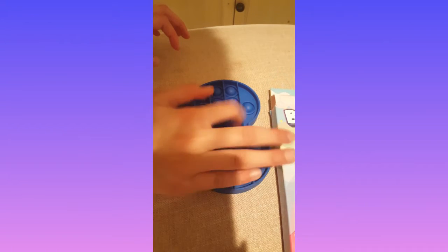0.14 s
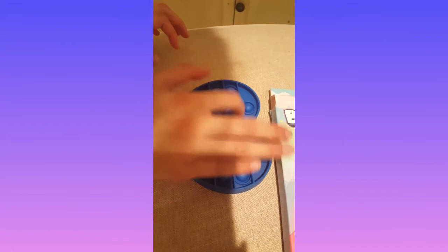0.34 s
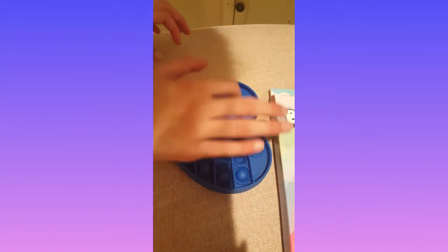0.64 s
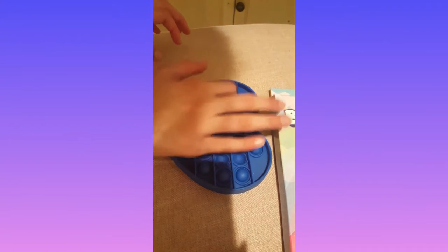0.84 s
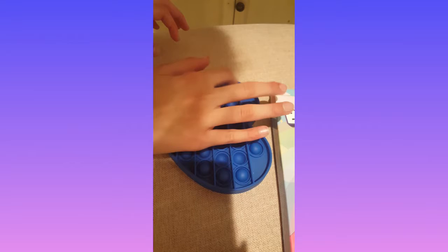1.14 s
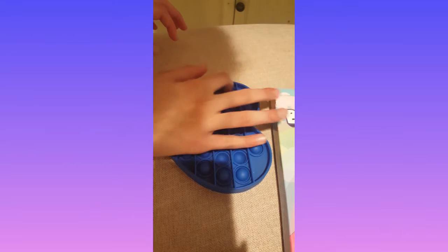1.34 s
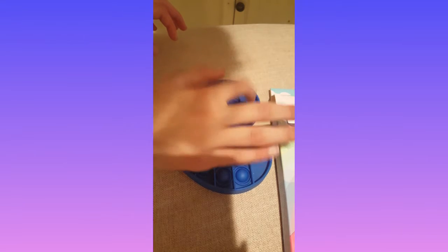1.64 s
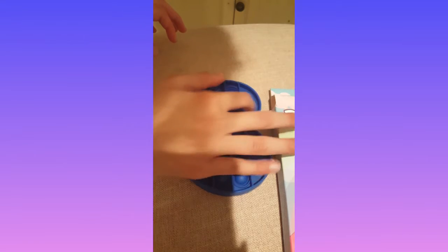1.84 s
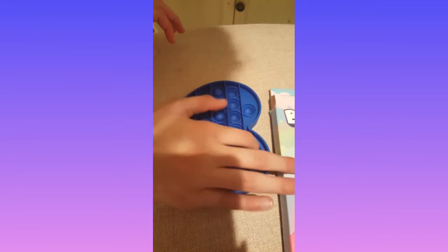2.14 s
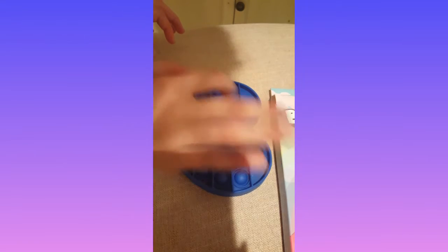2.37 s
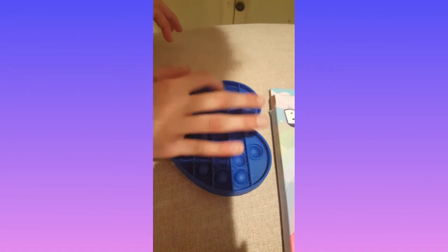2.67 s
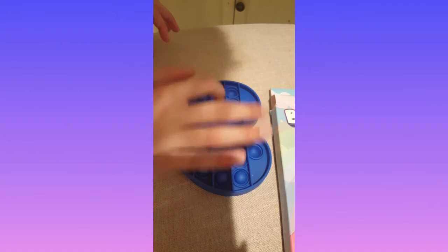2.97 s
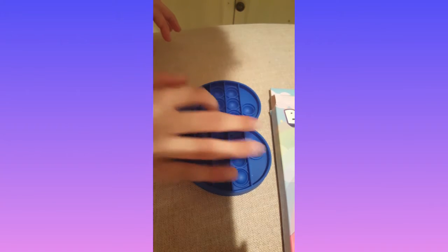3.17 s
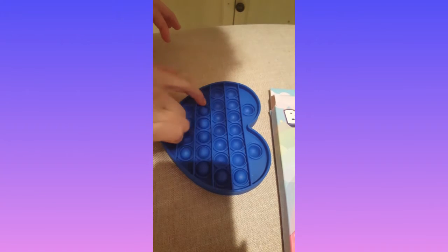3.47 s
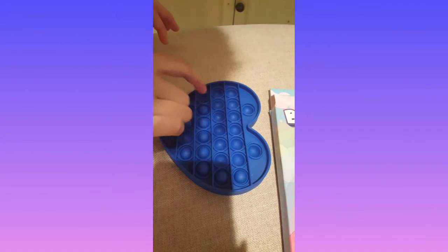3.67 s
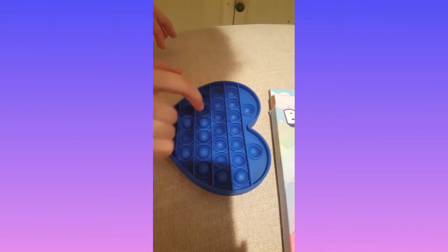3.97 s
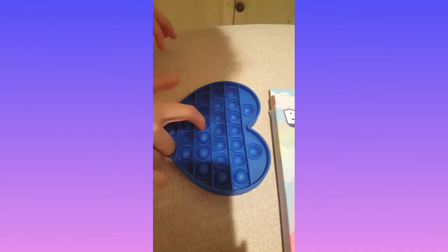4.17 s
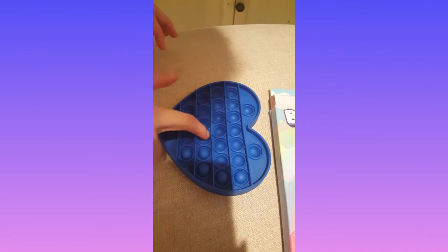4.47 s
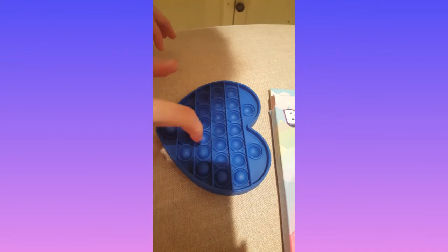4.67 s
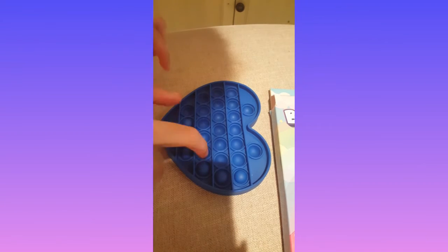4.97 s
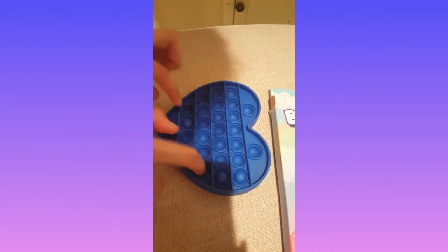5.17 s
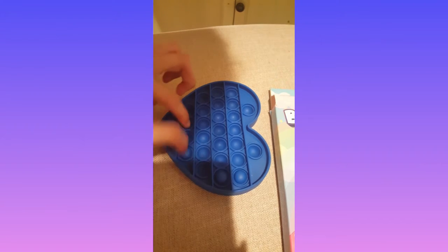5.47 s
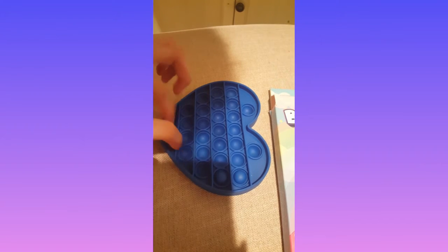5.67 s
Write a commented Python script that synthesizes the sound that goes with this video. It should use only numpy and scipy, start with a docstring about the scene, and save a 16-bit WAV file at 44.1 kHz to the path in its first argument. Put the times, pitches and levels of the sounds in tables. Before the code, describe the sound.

Close, uneven pops from a silicone bubble toy on a table, each led by a faint fingertip tap.

```python
"""A cloth-covered table in a quiet room, a phone's two microphones close to a silicone bubble toy.
A fingertip taps a dome, which loads up and snaps through with a short pop; the table thuds and the
room answers. Between pops the skin unsticks with tiny ticks and squeaks, and once a hand slides over
the toy. Underneath lie room air, microphone hiss and the low rumble of hands shifting on the table."""
import sys
import numpy as np
from scipy import signal
from scipy.fft import rfft, irfft, next_fast_len
from scipy.io import wavfile
from scipy.ndimage import uniform_filter1d

SR = 44100
rng = np.random.default_rng(int(sys.argv[2]) if len(sys.argv) > 2 else 0)


def int16_out(signal):
    """Quantize to a 16-bit WAV file."""
    q = np.round(np.clip(np.atleast_2d(signal).T, -1, 1) * 32767)
    wavfile.write(sys.argv[1], SR, q.astype(np.int16))


N = 256485
SPAN, LEAD, TAIL = 2 ** 14, 512, 15000  # samples: one contact, its lead-in, the room's tail
TIME = np.arange(N) / SR
FREQ = np.fft.rfftfreq(SPAN, 1 / SR)  # Hz axis of one contact's spectrum


def amp(db):
    """Decibels to gain."""
    return 10 ** (np.asarray(db) / 20)


def unit(x):
    """Scaled to rms 1."""
    return x / np.sqrt(np.mean(x ** 2) + 1e-20)


def peaked(spectrum):
    """Scaled so that its waveform peaks at 1."""
    return spectrum / np.abs(irfft(spectrum)).max()


def delay(seconds):
    """Spectrum of a delay."""
    return np.exp(-2j * np.pi * FREQ * seconds)


def along(points, hz):
    """(Hz, value) points read on a log axis."""
    f, v = np.transpose(points)
    return np.interp(np.log(hz + 1), np.log(f + 1), v)


def level(rows):
    """Gain per sample from (s, dB) rows."""
    s, db = np.transpose(rows)
    return amp(np.interp(TIME, s, db, left=-120, right=-120))


def sides(db):
    """Left and right gains for a level difference."""
    return amp(np.vstack([db / 2, -db / 2]))


def filtered(x, response):
    """x through a complex frequency response."""
    size = next_fast_len(N + SR // 2)
    return irfft(rfft(x, size) * response(np.fft.rfftfreq(size, 1 / SR)), size)[..., :N]


def resonances(modes, f):
    """Causal sum of (centre, width, dB) resonances; valleys form between neighbours."""
    return sum(amp(db) * 1j * f * w / (c * c - f * f + 1j * f * w) for c, w, db in modes)


def rush(spectrum, likeness, patchy_db):
    """Stereo noise of rms 1 with patches of random gain in time and frequency."""
    bins = signal.stft(rng.standard_normal((2, N)), nperseg=512)[2]
    patches = uniform_filter1d(rng.standard_normal(bins.shape[1:]), size=6, axis=0)
    patches = unit(uniform_filter1d(patches, size=10, axis=1))
    pair = signal.istft(bins * amp(patchy_db * patches), nperseg=512)[1][:, :N]

    def mid_side(hz):
        angle = np.arccos(np.clip(along(likeness, hz), -1, 1)) / 2
        return amp(along(spectrum, hz)) * [np.cos(angle), np.sin(angle)]
    mid, side = filtered(pair, mid_side)
    return unit(np.array([mid + side, mid - side]))


# The still room with the microphones' hiss. Each row: frequency in Hz, relative level in dB.
AIR_SPECTRUM = [(24, -40.5), (40, -6), (49, 1.5), (97, -3), (206, -7), (308, -8), (367, -10.5), (473, -13),
                (656, -16), (1290, -17), (2900, -21.5), (4920, -27), (10500, -30.5), (14900, -25),
                (16500, -42.5)]
# How alike the two microphones hear it. Each row: frequency in Hz, likeness from 0 to 1.
AIR_LIKENESS = [(60, 0.3), (200, 1), (600, 0.016), (15000, 0.0079)]
# Hands shifting on the table. Each row: time in seconds, level in dB.
RUMBLE_LEVELS = [(0.0, -62), (0.58, -62), (0.74, -53), (0.89, -60), (1.35, -59.5), (1.57, -61), (2.62, -65),
                 (2.76, -58.5), (3.33, -68.5), (4.33, -63), (4.9, -66), (5.04, -61.5), (5.46, -53),
                 (5.8, -64.5)]


def background():
    """Steady air and hiss; the table carries the hands' rumble, louder on the right."""
    air = amp(-62) * rush(AIR_SPECTRUM, AIR_LIKENESS, patchy_db=0)
    bass = [(20, -41), (32, -14.5), (50, 1.5), (130, -9.5), (300, -21.5), (600, -47.5), (1200, -93.5)]
    rumble = rush(bass, likeness=[(50, .63)], patchy_db=2.5)
    return air + level(RUMBLE_LEVELS) * rumble * sides(-3.5)


# One stroke of the hand, close up. Each row: time in seconds, level in dB.
SLIDE_LEVELS = [(.71, -81), (.735, -52), (.78, -49), (.83, -44.5), (.9, -56), (1.05, -67.5)]
# Skin rubbing on silicone. Each row: frequency in Hz, relative level in dB.
RUB_SPECTRUM = [(120, -24.5), (300, -7), (700, -1), (1500, -6.5), (2500, -2.5), (4000, -12.5), (6000, -21),
                (9000, -25.5), (13000, -48), (20000, -83)]


def hand_slide():
    """A hand brushes across the silicone."""
    return level(SLIDE_LEVELS) * rush(RUB_SPECTRUM, likeness=[(300, .4), (1500, .05)], patchy_db=1)


# Ticks close to the phone. Each row: start in seconds, peak level in dB, pitch in Hz.
SKIN_TICKS = [(1.065, -48, 5830), (1.241, -55, 5000), (1.300, -53, 13600), (1.531, -50, 4700),
              (1.961, -52, 3850), (3.005, -54.5, 3840), (4.976, -57, 6540), (5.211, -46.5, 5400)]


def ticks(t60_s=.014, relative_width=.54):
    """Skin unsticks from silicone in tiny bright bursts of noise around a pitch."""
    out = np.zeros((2, N))
    for start, db, hz in SKIN_TICKS:
        decay = (TIME >= start) * amp(-60 * np.abs(TIME - start) / t60_s)
        noise = decay * rng.standard_normal((2, N))
        burst = filtered(noise, lambda f: resonances([(hz, relative_width * hz, 0)], f) ** 2)
        out += amp(db) * burst / np.abs(burst).max()
    return out


# Squeaks, a little to the right. Each row: centre in seconds, level in dB, pitch in Hz,
# length in seconds.
SKIN_SQUEAKS = [(1.449, -44, 1578, 0.0077), (1.538, -50.5, 703, 0.014), (1.555, -45, 691, .014)]


def squeaks():
    """Skin peels off silicone in short soft notes, roughened as it slips."""
    roughness = 1 + .8 * unit(uniform_filter1d(rng.standard_normal((2, N)), size=60))
    notes = sum(amp(db) * np.exp(-(2.7 * (TIME - s) / length) ** 2) * np.sin(2 * np.pi * hz * TIME)
                for s, db, hz, length in SKIN_SQUEAKS)
    return notes * roughness * sides(-1.5)


# The room heard from the table. Each row: frequency in Hz, seconds to fade by 60 dB.
ROOM_DECAY = [(100, 0.17), (420, 0.26), (1100, 0.32), (2900, 0.25), (7700, 0.32), (15000, .15)]
# The colour of its echo. Each row: frequency in Hz, relative level in dB.
ROOM_COLOUR = [(100, 3.5), (500, -2), (1100, -2), (2000, -3.3), (3200, -0.5), (4500, -3.5), (7000, 1.5),
               (12000, -27.5)]


def room(build_s=.002, reflection_s=.0125, shared_hz=350):
    """Spectrum of a fresh reverberant tail; below shared_hz both microphones hear much the same."""
    hz, t, bins = signal.stft(rng.standard_normal((2, TAIL)), SR, nperseg=128)
    fade = amp(along(ROOM_COLOUR, hz)[:, None] - 60 * t / along(ROOM_DECAY, hz)[:, None])
    tail = signal.istft(bins * fade, SR, nperseg=128)[1][:, :TAIL]
    t = np.arange(TAIL) / SR
    onset = np.clip(t / build_s, 0, 1) ** 1.4
    reflection = 2.3 * np.exp(-((t - reflection_s) / .00061) ** 2)
    tail = tail * (onset + reflection) * np.sqrt(1 - (t / t[-1]) ** 2)
    left, right = rfft(tail / np.linalg.norm(tail[0]), SPAN)
    shared = .85 / (1 + (FREQ / shared_hz) ** 2)
    return np.array([left, shared * left + np.sqrt(1 - shared ** 2) * right])


# The table's modes in two groups, boom and knock. Each row: pitch in Hz, width in Hz, gain in dB.
TABLE_MODES = [
    [(48, 27, -2), (71.4, 120, -2), (99, 60, -5)],
    [(157.2, 29, -1), (250, 220, -10)],
]
# The thud at the microphones. Each row: frequency in Hz, left over right in dB.
THUD_BALANCE = [(45, -11), (75, -10), (125, -3), (220, -1)]


def table_thud(force, boom_db, knock_db):
    """The table takes the blow a little later; its slow boom swells behind the knock."""
    boom, knock = [peaked(force * resonances(modes, FREQ * amp(rng.normal(0, .26))))  # slightly detuned
                   for modes in TABLE_MODES]
    swell = lambda seconds: 1 / (1 + 2j * np.pi * FREQ * seconds) ** 2
    boom = amp(boom_db) * peaked(boom * swell(.0042)) * delay(.0095)
    knock = amp(knock_db) * peaked(knock * swell(.00076)) * delay(.0033)
    low_cut = (1j * FREQ / (40 + 1j * FREQ)) ** 3
    return (boom + knock) * low_cut * sides(along(THUD_BALANCE, FREQ))


# The phone's body shades its microphones. Each row: frequency in Hz, left over right in dB.
PHONE_SHADING = [(300, -.5), (700, -2.5), (1300, 3), (2400, 3.5), (4400, 0), (9000, 12), (14000, 12)]
# Sound reaches the left microphone first. Each row: frequency in Hz, phase lead in radians.
LEFT_PHASE_LEAD = [(100, 0), (520, .3), (1210, 1.6), (2240, 1.4), (3270, 1.8), (4250, 2.2), (5300, 4.2),
                   (7320, 7), (16600, 32.8)]


def close_path(sound):
    """From toy to microphones; things on the table scatter four weak copies on the way."""
    turn = np.exp(.5j * along(LEFT_PHASE_LEAD, FREQ))
    direct = sound * sides(along(PHONE_SHADING, FREQ)) * [turn, 1 / turn]
    delays_s = rng.uniform(.002, .006, size=(4, 2, 1))
    gains = rng.normal(0, .05, size=(4, 2, 1))
    return direct * (1 + np.sum(gains * delay(delays_s), axis=0))


# The slap's bands in two groups, crack and tick. Each row: centre and width as multiples of the
# group's pitch, weight in dB.
SLAP_BANDS = [
    [(.81, 0.25, -1), (1, 0.5, 8), (1.46, 0.42, -12.5)],
    [(1, 0.51, -4.5), (1.385, 0.084, -1.5)],
]


def slap(drive, levels_db, crack_hz, tick_hz=10600):
    """The toy's skin slaps the table: a crack with a higher tick."""
    return sum(amp(db) * peaked(drive * resonances(modes, FREQ / hz) ** 2)
               for db, modes, hz in zip(levels_db, SLAP_BANDS, (crack_hz, tick_hz)))


# A dome's modes in four groups: cavity, wall, rim, edge. Each row: centre and width as multiples of
# the group's pitch, gain in dB.
DOME_MODES = [
    [(.62, .4, -23.5), (1.01, .22, 4.5)],
    [(1.01, .2, 2.5), (1.42, .3, 3)],
    [(1.01, .2, .5)],
    [(1.01, .16, 7), (1.15, .14, -1.5)],
]


def dome_ring(force, levels_db, pitches_hz, edge_over_rim=1.233):
    """The force rings the dome's cavity, wall, rim and edge."""
    pitches_hz = (*pitches_hz, edge_over_rim * pitches_hz[-1])
    cutoffs = (1.1, 2.83, 2.8, 1.6)  # soft rubber passes little above these multiples of each pitch
    ring = 0
    for modes, db, hz, cutoff in zip(DOME_MODES, levels_db, pitches_hz, cutoffs):
        response = resonances(modes, FREQ / hz) * np.exp(-(FREQ / hz / cutoff) ** 4)
        ring += amp(db) * peaked(force * response)
    low_cut = 1j * FREQ / (260 + 1j * FREQ)  # so small a source radiates little bass
    hand_echo = 1 + .047 * delay(.0016)  # off the hand above the toy
    return ring * low_cut * hand_echo


def contact(start, dome_db, slap_db, boom_db, knock_db, pitches_hz, crack_hz, load_s, sign, room_db):
    """One contact: force builds over load_s and lets go, ringing dome, table and room."""
    release = delay(LEAD / SR + .0027)
    force = sign * release / (1 - 2j * np.pi * FREQ * load_s)
    dome = dome_ring(force, dome_db, pitches_hz)
    # close by the slap is a grainy spray; the room's walls hear its average colour
    spray = rfft(rng.standard_normal(600) * amp(-60 * np.arange(600) / SR / .0076), SPAN)
    near = close_path(dome + slap(release * spray, slap_db, crack_hz))
    slap_colour = amp(-1.5) * np.abs(slap(release, slap_db, crack_hz))
    far = np.hypot(np.abs(dome), slap_colour) * np.exp(1j * np.angle(dome))
    thud = table_thud(force, boom_db, knock_db)
    reverb = (amp(room_db) * far + amp(-2.5) * thud) * room()
    padded = np.zeros((2, N + 3 * SPAN))
    first = SPAN + round(start * SR) - LEAD
    padded[:, first:first + SPAN] = irfft(near + thud + reverb)
    return padded[:, SPAN:SPAN + N]


# Fingertips landing on or leaving the toy, close to the phone. Each row: start in seconds,
# dome wall level in dB, table boom in dB.
FINGER_TAPS = [(.220, -34, -33.5), (0.522, -36.5, -39), (1.061, -36, -40), (1.334, -43, -58),
               (1.529, -44.5, -55), (1.738, -38, -42.5), (1.901, -41, -42), (2.122, -35.5, -48.5),
               (2.563, -32.5, -37.5), (2.695, -41, -44), (2.795, -33.5, -41), (3.069, -31, -46),
               (3.506, -34.5, -38.5), (3.535, -69, -54.5), (3.823, -33, -48.5), (4.169, -34.5, -45),
               (4.481, -36.5, -44), (4.498, -42.5, -39), (4.866, -34.5, -56), (5.126, -33, -39),
               (5.355, -40, -57), (5.549, -33, -41.5), (5.782, -40.5, -47.5)]


def taps():
    """A fingertip's tap is much quieter than a pop and pushes inward."""
    out = np.zeros((2, N))
    for start, wall_db, boom_db in FINGER_TAPS:
        dome_db = wall_db + np.array([-6, 0, -14.5, -17.5])  # cavity, wall, rim, edge
        slap_db = wall_db + np.array([-22, -39])  # crack, tick
        out += contact(start, dome_db, slap_db, boom_db, boom_db - 2, pitches_hz=(734, 1170, 2500),
                       crack_hz=5500, load_s=.00024, sign=-1, room_db=-15.5)
    return out


# Domes popping close to the phone; the first is heard only as its tail. Each row: start in seconds,
# wall level in dB, snap (rim over wall) and crack over wall in dB, table boom and knock in dB,
# then the pitches of cavity, wall, rim and crack in Hz.
DOME_POPS = [(-.045, -3.5, -18.5, -22, -33, -52, 680, 1010, 2520, 5640),
             (0.242, -4, -14.5, -40, -30.5, -37.5, 654, 975, 2510, 5300),
             (0.55, -5.5, -10, -27, -38.5, -26, 786, 915, 2730, 4980),
             (0.817, -4, -12.5, -23, -26.5, -29, 550, 1010, 2650, 6470),
             (1.347, -5.5, -13.5, -22.5, -34.5, -40, 630, 1156, 2810, 4470),
             (1.759, -5, -13.5, -30, -30, -33, 774, 1057, 2520, 5330),
             (2.1534, -2.5, 1.5, -25, -33.5, -26, 728, 1180, 2367, 5870),
             (2.582, -5, -14.5, -37, -31, -43, 712, 1023, 2580, 5840),
             (2.8135, -4.5, -19, -24.5, -32, -39.5, 696, 1445, 2707, 4400),
             (3.0863, -1.5, -0.5, -21.5, -44, -27.5, 590, 1230, 2303, 5200),
             (3.567, -4.5, -14.5, -30, -41.5, -43.5, 721, 1108, 2485, 4670),
             (3.839, -3.5, -15, -28, -29.5, -41.5, 682, 1113, 2480, 5400),
             (4.194, -2.5, -14.5, -44, -35, -37, 712, 1110, 2450, 5900),
             (4.528, -3, 1, -14, -45, -46.5, 686, 1397, 2535, 5576),
             (4.889, -1.5, -13.5, -54.5, -31.5, -43.5, 700, 1115, 2530, 6070),
             (5.145, -1, -15, -33.5, -24.5, -37, 692, 1110, 2370, 6000),
             (5.386, -3, -1, -18.5, -39.5, -37.5, 730, 1220, 2470, 6010),
             (5.563, -2.5, -15, -41.5, -41.5, -33, 710, 1230, 2590, 6300)]


def pops():
    """A dome loads up and snaps through; a sharper snap lifts rim and edge and thins the cavity."""
    out = np.zeros((2, N))
    for start, wall_db, snap, crack, boom_db, knock_db, *pitches_hz, crack_hz in DOME_POPS:
        dome_db = wall_db + np.array([-13 - .31 * snap, 0, snap, -3 + 1.05 * snap])
        slap_db = wall_db + np.array([crack, -13 + 1.35 * crack])
        out += contact(start, dome_db, slap_db, boom_db, knock_db, pitches_hz, crack_hz,
                       load_s=.00016, sign=1, room_db=-17.5)
    return out


def scene():
    """Everything at the two microphones."""
    return pops() + taps() + squeaks() + ticks() + hand_slide() + background()


def record(dry):
    """The phone rounds off the loudest peaks, fades deep bass and keeps nothing above top_hz."""
    low_hz, top_hz = 24.4, 16900
    rounded = dry / (1 + np.abs(dry / .995) ** 8) ** (1 / 8)
    return filtered(rounded, lambda hz: (hz < top_hz) * (1j * hz / (low_hz + 1j * hz)) ** 2)


dry = scene()
out = record(dry)
int16_out(out)
```